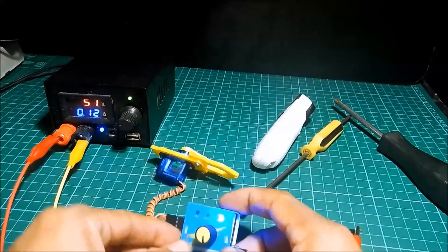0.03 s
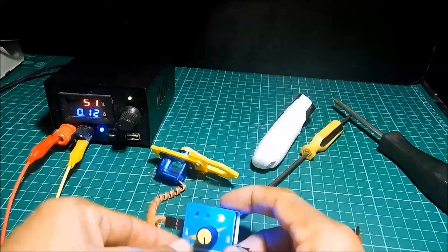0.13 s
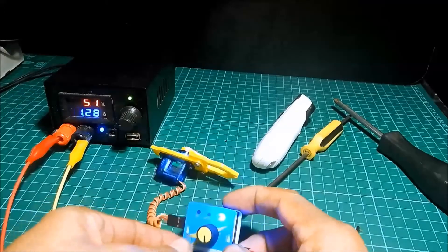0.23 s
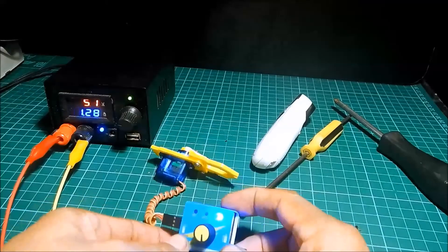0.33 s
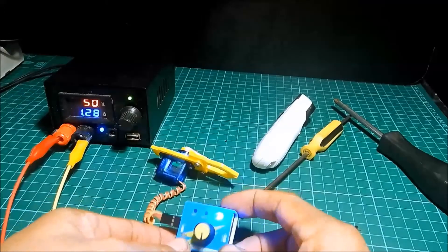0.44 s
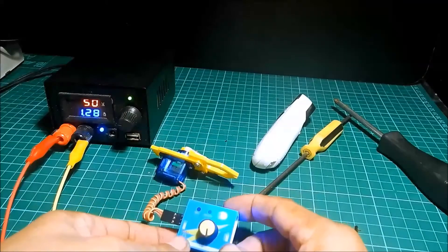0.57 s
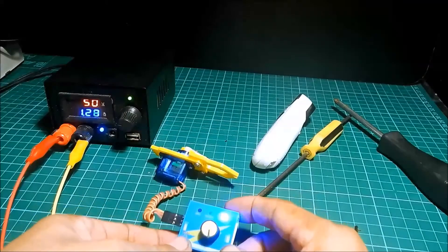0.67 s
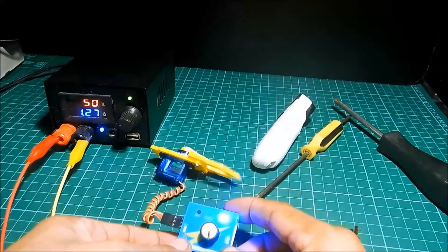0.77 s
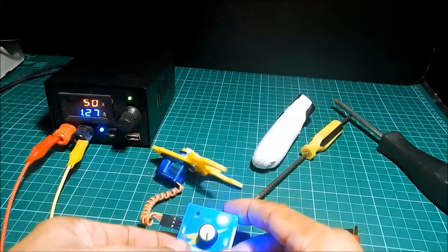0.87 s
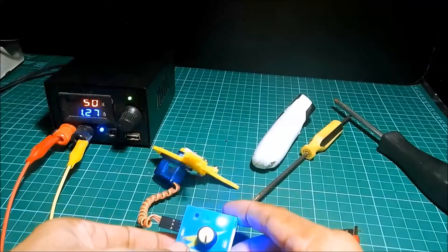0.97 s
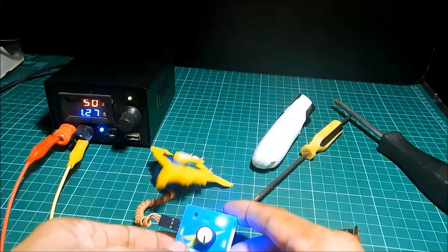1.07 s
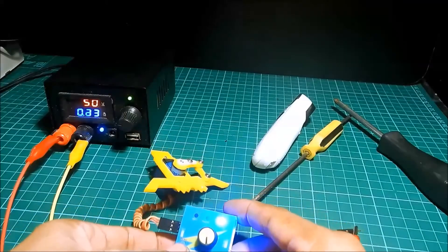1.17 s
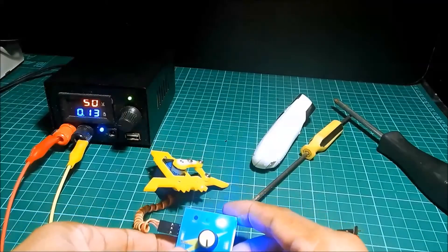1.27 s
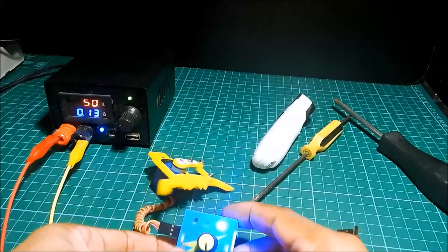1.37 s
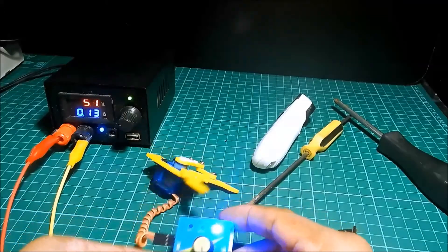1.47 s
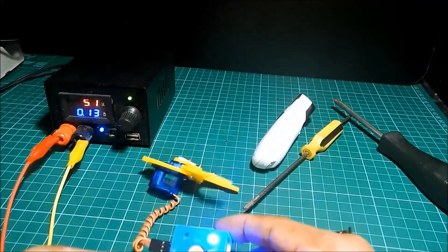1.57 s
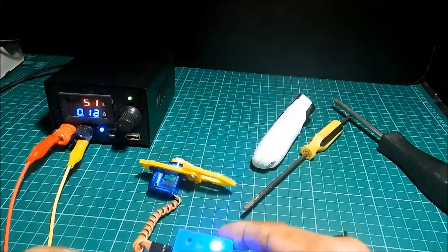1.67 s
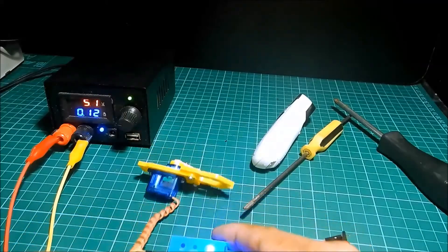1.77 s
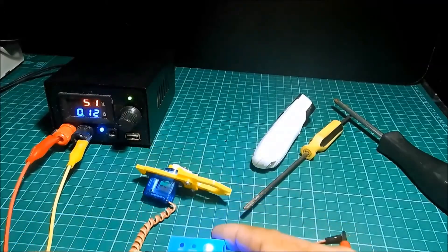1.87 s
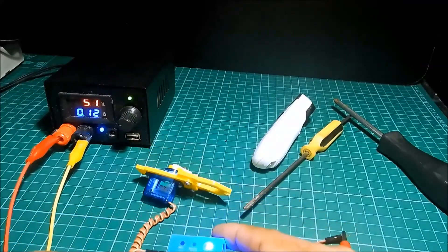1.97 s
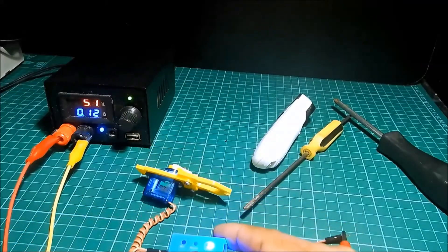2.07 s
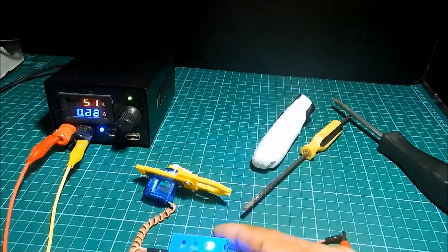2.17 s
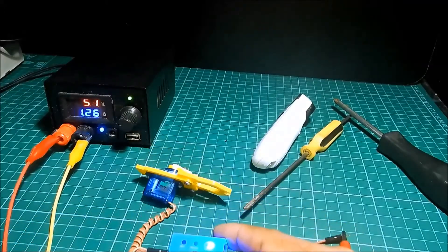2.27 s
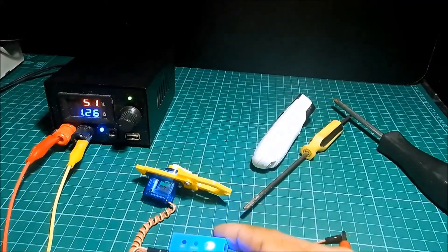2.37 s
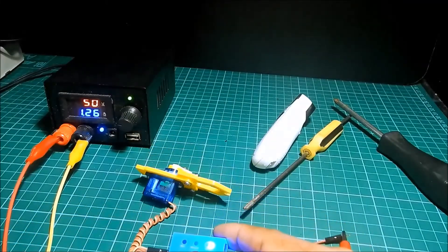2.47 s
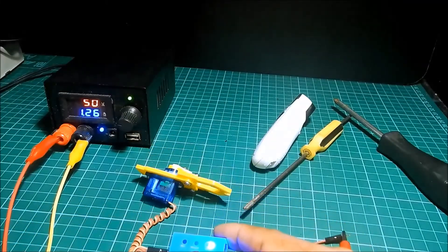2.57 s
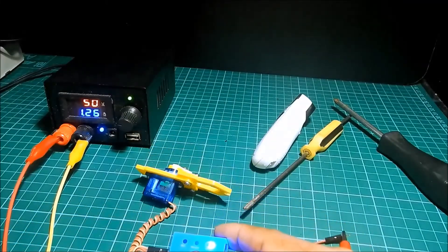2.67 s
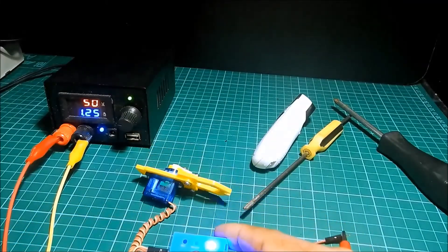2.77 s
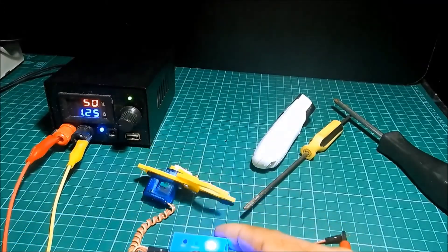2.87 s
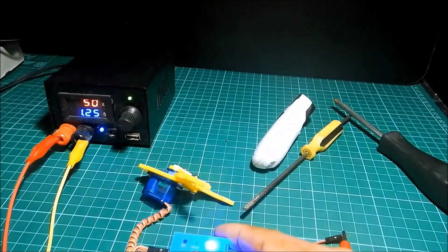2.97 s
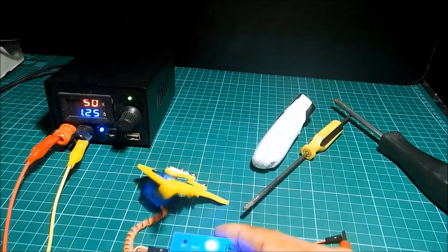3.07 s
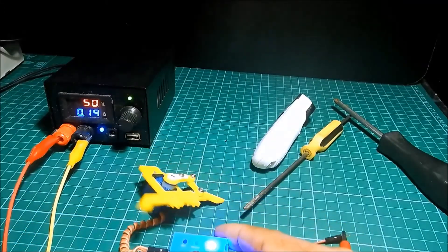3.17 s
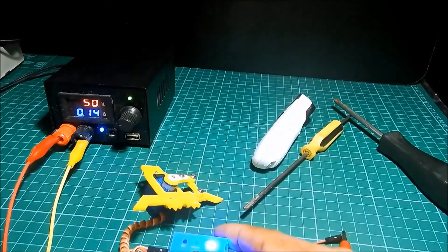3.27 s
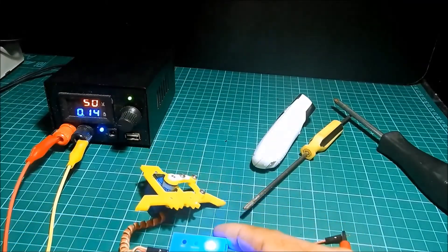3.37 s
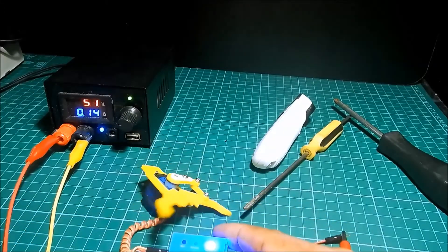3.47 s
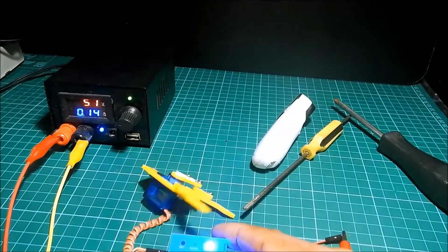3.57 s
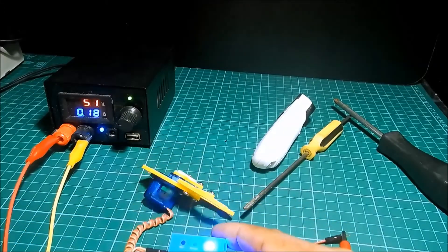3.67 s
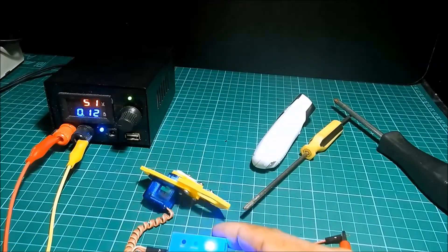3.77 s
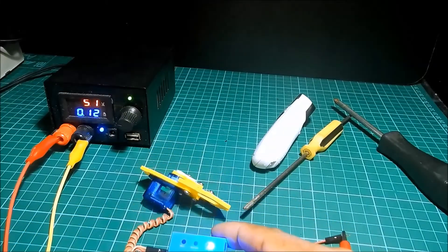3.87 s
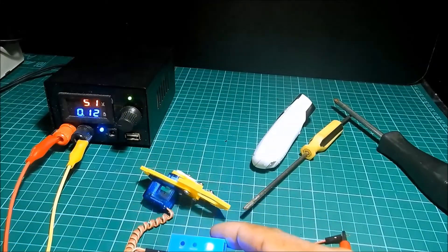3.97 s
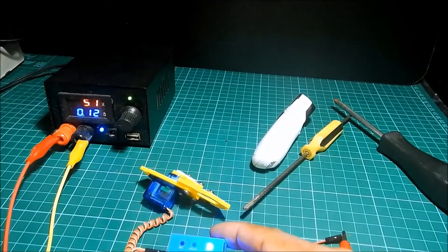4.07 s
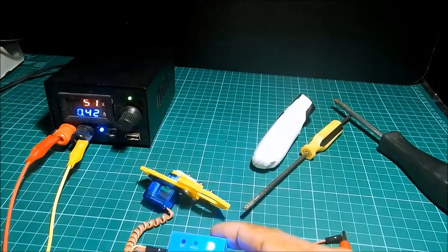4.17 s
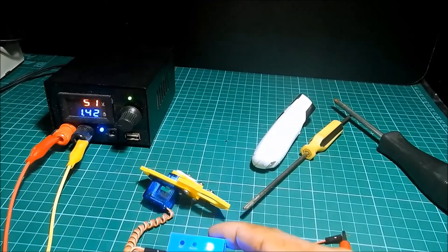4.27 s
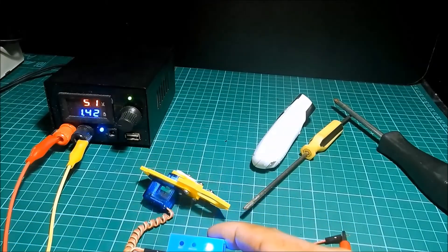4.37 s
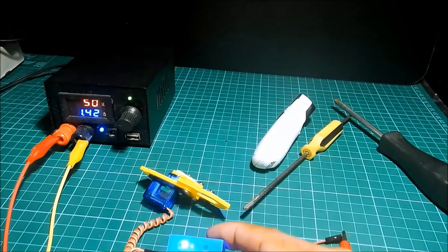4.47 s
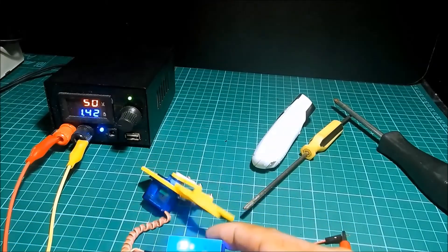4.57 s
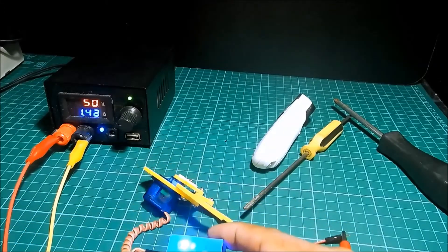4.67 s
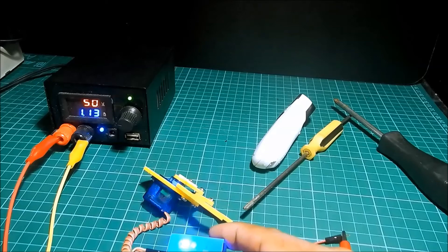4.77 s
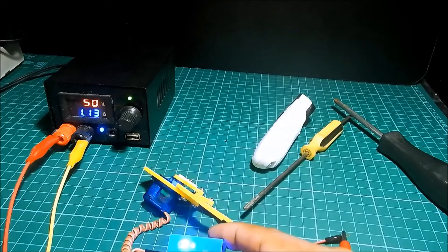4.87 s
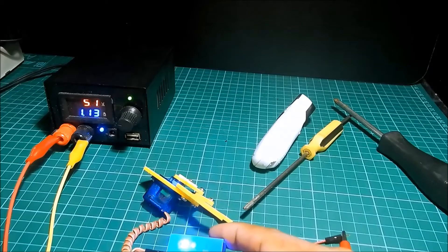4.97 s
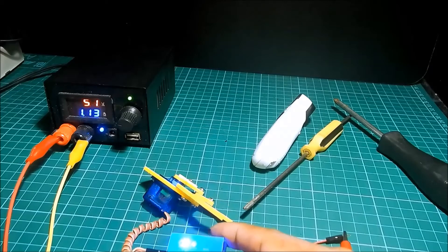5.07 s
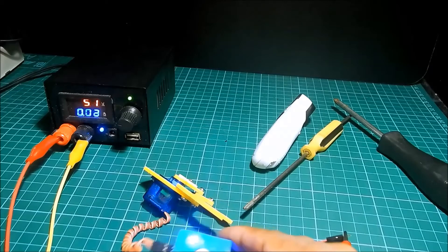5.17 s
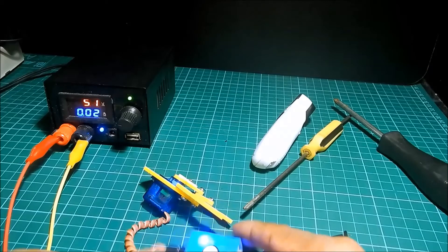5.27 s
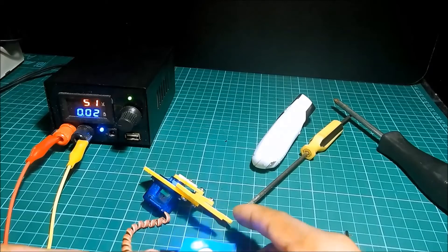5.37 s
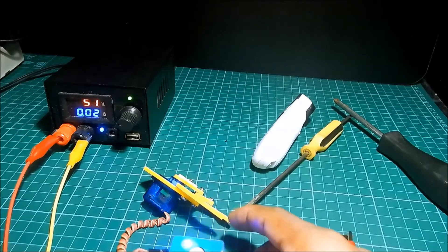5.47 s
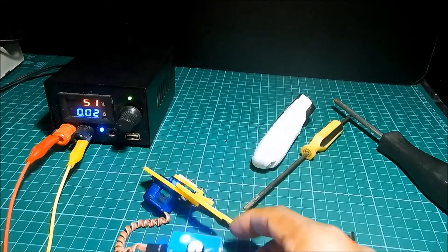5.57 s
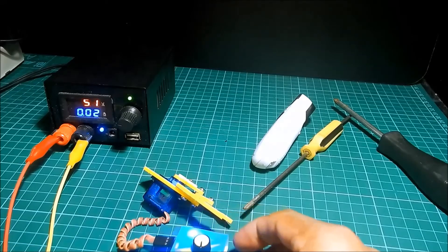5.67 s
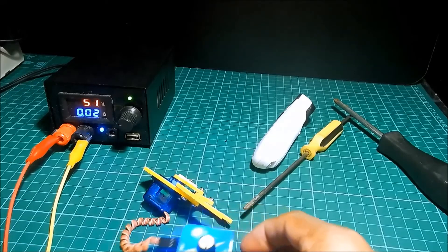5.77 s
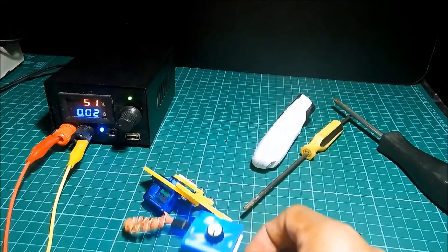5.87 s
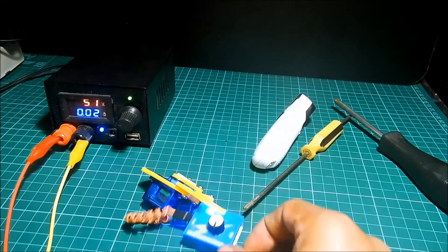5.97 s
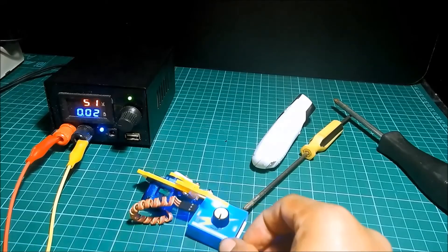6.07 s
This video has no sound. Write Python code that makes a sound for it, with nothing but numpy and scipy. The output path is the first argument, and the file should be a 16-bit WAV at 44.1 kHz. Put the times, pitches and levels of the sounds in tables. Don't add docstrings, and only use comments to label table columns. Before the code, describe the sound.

A steady low fan hiss and quiet room rumble lie under everything, with a far drone swelling faintly. From 0 to 0.8 s fingers slide softly on a plastic box, with a few tiny ticks. At 0.83 s a small servo whirs, bright and gritty, until 1.2 s, with a sharp plastic clack at 0.9 s and lighter knocks. A nudge at 1.25 s leads to a rising whir from 1.38 to 1.81 s, rattling and drumming on the bench, then a soft drag and settling at 1.9 s. Quiet handling follows. Another hard clack at 2.95 s accompanies whirs at 2.9-3.33 and 3.44-3.87 s. After a pause, a loud click at 4.57 s precedes a very short, straining stroke and the loudest snap at 4.64 s, ending with a click at 4.72 s. Faint rustles, wrist shifts and dry ticks continue to 6.1 s. Close microphone, small room.

```python
import sys
import numpy as np
from scipy import signal
from scipy.fft import rfft, irfft, next_fast_len
from scipy.io import wavfile

SR = 44100
rng = np.random.default_rng(int(sys.argv[2]) if len(sys.argv) > 2 else 0)


def how_loud(loudness_db):
    steps = np.asarray(loudness_db, float) / 20
    return 10 ** steps


def transcribe(u):
    v = np.clip(np.atleast_2d(u).T, -1, 1)
    q = np.round(v * 32767).astype(np.int16)
    wavfile.write(sys.argv[1], SR, q)


N = 269887

# frequency in Hz, level in dB per Hz.
AIR = [(12, -37), (20, -7), (107, -2.5), (301, -14.5), (485, -16.5), (607, -21), (849, -20.5), (976, -22.5),
       (1710, -20.5), (1960, -28.5), (2670, -30.5), (3530, -36), (4670, -42), (6540, -55.5), (9000, -63),
       (16000, -63)]
# centre in Hz, width in Hz, lift in dB.
CAVITY_RINGS = [(1614, 170, 3.5), (2757, 140, 9.5), (4650, 530, 10)]
# frequency in Hz, likeness from -1 to 1.
LIKENESS = [(60, 1), (180, 0.86), (550, 0.85), (1650, 1), (4970, 0.56), (15000, 0.62)]
# start in seconds, end in seconds, level in dB.
DRONE = [
    (0.7, 0.85, -49.5),
    (1.25, 1.35, -46.5),
    (1.5, 1.7, -50.5),
    (3.55, 3.7, -44),
    (3.9, 4.3, -49.5),
    (5.2, 5.4, -47),
    (6.05, 6.12, -54.5),
]
# start in seconds, end in seconds, level in dB, centre from Hz, to Hz.
SLIDES = [(0.0, 0.13, -67.5, 4500, 4650), (0.15, 0.22, -68, 4700, 4900), (0.36, 0.44, -77.5, 4700, 4700),
          (2.52, 2.6, -73, 2290, 2470), (2.68, 2.72, -75, 4600, 4630), (4.0, 4.08, -80, 4570, 4500),
          (4.17, 4.23, -79, 4700, 4700), (4.27, 4.36, -68, 4650, 4650), (4.38, 4.54, -75, 4650, 4640),
          (4.95, 5.03, -76, 4220, 4540), (5.16, 5.24, -73, 4750, 4570), (5.25, 5.33, -67.5, 3900, 4200),
          (5.35, 5.44, -70, 4900, 4900), (5.46, 5.62, -66.5, 4800, 4800), (5.64, 5.76, -73.5, 5600, 5900),
          (5.81, 5.97, -69, 5020, 5500), (6.0, 6.12, -70, 4050, 4400)]
# frequency in Hz, level in dB per Hz.
SKIN = [(1060, -40), (1800, -27), (2220, -6), (2940, 3.5), (4010, -2), (4940, 2), (7060, -27.5),
        (9000, -66.5), (11700, -79), (19800, -120)]
# start in seconds, end in seconds, level in dB.
SLEEVE = [
    (0.155, 0.215, -83),
]
# start in seconds, end in seconds,
# level in dB.
WRISTS = [
    (0.27, 0.3, -63),
    (1.89, 1.965, -47),
    (2.5, 2.55, -58),
    (2.68, 2.75, -48.5),
    (4.1, 4.16, -50.5),
    (4.2, 4.55, -62),
    (4.95, 5.0, -51.5),
    (5.17, 5.45, -59),
    (5.88, 5.91, -49),
    (6.03, 6.12, -50.5),
]
# start in seconds, peak in dB, centre in Hz, decay t60 in seconds, left-right balance in dB.
TICKS = [(0.236, -50, 1300, 0.012, 3), (0.2578, -45.5, 2700, 0.013, 2), (0.279, -42, 2920, 0.034, 2),
         (0.28, -48, 800, 0.03, 2), (0.5753, -53.5, 3750, 0.008, 7), (0.7787, -50, 3060, 0.007, 7),
         (1.6252, -37.5, 4800, 0.0085, -3), (1.781, -51.5, 11400, 0.03, -0.5), (2.528, -53, 2500, 0.04, 2),
         (2.68, -51, 3300, 0.04, 2), (3.274, -45, 3500, 0.015, 0.5), (3.302, -40, 3300, 0.035, 0.5),
         (3.421, -44, 4000, 0.02, 3), (3.755, -37, 2400, 0.04, 0.5), (3.834, -50.5, 12000, 0.018, 0.5),
         (3.8345, -31, 6000, 0.01, 0.5), (4.4593, -50, 4800, 0.018, 5), (4.5714, -12, 4300, 0.007, 2.5),
         (5.385, -43, 2500, 0.015, 2), (5.3855, -46, 1200, 0.02, 2), (5.386, -48, 4800, 0.015, 2),
         (5.405, -50, 3350, 0.02, 3), (5.4503, -39.5, 3600, 0.015, -4), (5.4816, -45, 3500, 0.02, 1.0),
         (5.498, -48, 3480, 0.015, 8), (5.509, -52, 3500, 0.02, 3), (5.7055, -53, 3480, 0.017, 0.5),
         (5.726, -52, 3380, 0.013, 9), (5.8551, -46, 4500, 0.012, 2), (5.899, -52, 3500, 0.015, 2),
         (5.918, -53, 3400, 0.012, 2), (5.9623, -54, 4670, 0.011, 0.0), (5.9873, -52, 4800, 0.013, 5),
         (6.0295, -38, 3300, 0.036, 3.5), (6.0396, -42, 3300, 0.028, -4)]
# start in seconds, end in seconds, level in dB.
DRAG = [
    (1.82, 1.86, -76),
    (1.88, 1.96, -53.5),
    (2.68, 2.73, -56.5),
]
# frequency in Hz, level in dB, decay t60 in seconds.
GRIPPER = [(587, -5.5, 0.024), (760, -2.5, 0.019), (1094, -55.5, 0.014), (1240, -25, 0.048),
           (1503, 8, 0.023), (1574, -16.5, 0.013), (2040, 2.5, 0.0099), (2190, -3.5, 0.015),
           (2547, -1, 0.028), (2700, -1.5, 0.015)]
# frequency in Hz, level in dB, decay t60 in seconds.
SNAP = [(3060, 4, 0.01), (3200, -4.5, 0.031), (3487, 10.5, 0.018), (4370, 20, 0.0039), (4710, -2.5, 0.012),
        (5300, -13, 0.013), (7005, -6, 0.015)]
# frequency in Hz, level in dB, decay t60 in seconds.
BENCH = [(197, -9, 0.19), (227.6, 0, 0.069), (289.7, -12.5, 0.12), (525, -9, 0.057)]
# time in seconds, body peak in dB, bright snap in dB, bench thud in dB.
KNOCKS = [(0.903, -12.5, -46, -34.5), (0.969, -31, -75, -45), (1.072, -37.5, -65, -73),
          (1.193, -31.5, -47, -33), (1.235, -32.5, -47, -33), (1.259, -47, -37.5, -66),
          (1.405, -32.5, -55, -44), (1.558, -40, -57, -64), (1.617, -36.5, -53, -38.5),
          (1.702, -24.5, -53, -34), (1.73, -37, -50, -52), (1.781, -50, -39.5, -37), (1.81, -41, -54, -40),
          (2.9545, -13, -21.5, -35), (3.024, -33.5, -59, -44.5), (3.117, -37.5, -59, -72),
          (3.273, -30.5, -44, -28.5), (3.304, -54, -48, -68), (3.457, -42, -46, -40.5),
          (3.507, -37, -52, -56), (3.669, -36.5, -43, -39.5), (3.753, -31.5, -50, -34),
          (3.786, -38, -46, -48.5), (3.834, -35.5, -34, -59), (4.6353, -5, -10.5, -31),
          (4.715, -19.5, -40, -35.5), (4.719, -49, -23.5, -39)]
# time in seconds, peak in dB.
BUMPS = [(0.277, -41.5), (0.855, -36), (1.27, -36), (1.511, -50), (1.666, -36), (1.847, -42.5),
         (1.899, -42), (1.933, -35), (2.923, -38.5), (2.989, -35), (3.231, -34.5), (3.638, -40.5),
         (3.89, -40), (4.126, -44), (4.613, -37), (4.679, -31), (5.181, -44), (5.359, -45), (5.4, -43.5)]
# time in seconds, peak in dB, length in seconds, share of jaw scrape in dB.
STRAINS = [(0.826, -45, 0.013, -41), (0.8398, -34.5, 0.019, -24), (0.865, -29, 0.018, -17),
           (0.874, -31.5, 0.021, -3.5), (0.931, -32.5, 0.0098, -19), (0.947, -37, 0.0089, -18),
           (1.008, -55, 0.032, -29), (1.182, -39.5, 0.022, -22), (1.254, -51, 0.021, 4),
           (1.389, -41.5, 0.043, -11), (1.494, -46, 0.063, -14.5), (1.592, -48, 0.049, -35),
           (1.68, -46, 0.018, -9), (1.746, -39.5, 0.021, -24), (1.761, -30, 0.0076, -36),
           (1.78, -32.5, 0.013, -9), (2.878, -37, 0.031, -38), (2.918, -31.5, 0.035, -6),
           (2.99, -47, 0.023, 0), (3.126, -42, 0.0072, -8), (3.161, -39.5, 0.015, -33),
           (3.203, -38, 0.0085, -27), (3.316, -51, 0.028, -8), (3.45, -38, 0.028, -11.5),
           (3.8, -32, 0.026, -18), (3.835, -30.5, 0.015, -12), (4.598, -25.5, 0.017, -22),
           (4.618, -21.5, 0.034, -10.5), (4.625, -24, 0.017, -23), (4.72, -28.5, 0.014, -11)]
# time in seconds, peak in dB.
KICKS = [(0.9964, -44), (1.009, -41), (1.0265, -35), (1.0494, -45), (1.07, -43), (1.0869, -40.5),
         (1.107, -41), (1.1244, -48), (1.1488, -44), (1.1697, -39), (1.2271, -46), (1.265, -45),
         (1.4187, -52), (1.4394, -41.5), (1.48, -42), (1.5194, -42), (1.5394, -41), (1.581, -39),
         (1.6394, -40.5), (1.6594, -41), (1.704, -49), (1.7244, -42), (2.984, -38), (3.0034, -42),
         (3.0244, -53), (3.044, -39), (3.065, -42), (3.0799, -40), (3.106, -43), (3.142, -35.5),
         (3.1603, -44), (3.1794, -54), (3.2244, -41), (3.243, -39), (3.3019, -45), (3.3294, -48),
         (3.4339, -39), (3.4984, -41), (3.5194, -50), (3.5394, -54), (3.5795, -38), (3.6094, -45),
         (3.6406, -42), (3.659, -38), (3.677, -44), (3.698, -48), (3.7249, -43), (3.7394, -37),
         (3.7794, -40), (3.852, -33.5), (3.8844, -41), (4.6544, -51), (4.6718, -45), (4.694, -33)]
# full speed in seconds, drive cut in seconds,
# whirr at start in dB, whirr at end in dB, bench drumming in dB.
STROKES = [
    (0.833, 1.204, -49.5, -50.5, -69.5),
    (1.252, 1.26, -48.5, -45, -59),
    (1.382, 1.811, -49.5, -44.5, -57.5),
    (2.893, 3.33, -49, -50.5, -70),
    (3.44, 3.865, -47.5, -47, -59),
    (4.611, 4.719, -46, -44.5, -53),
]
# lower ring from Hz, to Hz, upper ring from Hz, to Hz.
CASE_ROLL = [(4990, 4910, 6660, 6640), (4920, 4920, 6590, 6590), (4920, 4870, 6580, 6510),
             (4920, 4660, 6450, 6750), (4740, 4780, 6600, 6620), (4750, 4750, 6700, 6700)]
# lower ring from dB, to dB, upper ring from dB, to dB.
CASE_FACING = [(8, 1, 3.5, 4.5), (4, 4.5, 4, 4.5), (5, 8, 0.5, 3.5), (7.5, 9.5, -2, 0), (2.5, 5, -1, -0.5),
               (0.5, 4.5, -5, -5.5)]
# frequency in Hz, width in Hz, level in dB.
CASE = [(3420, 200, -11), (3850, 150, -14), (4300, 200, -13), (5500, 150, -9), (5780, 200, -11),
        (7500, 200, -15), (7950, 200, -17), (8600, 250, -23), (9400, 250, -27)]
# frequency in Hz, level in dB per Hz.
MESH = [(1800, -36), (3000, -23.5), (4200, -13), (5600, -10.5), (7200, -15), (8300, -22.5), (9600, -27),
        (10300, -35), (12800, -44.5), (14500, -45), (16000, -49.5), (17000, -69.5)]
# lower edge in Hz, upper edge in
# Hz, level in dB.
MESH_TOP = [(10300, 11600, -9), (11600, 16000, -5), (13140, 14800, -4)]

AIR_DB = -56
SWELL_DB_PER_S, SLIDE_DB_PER_S, SETTLE_DB_PER_S, DRAG_DB_PER_S = 39, 258.5, 214.5, 406
TICK_FIZZ, LOUD_TICK_FIZZ = 0.22, 0.1
SOFT_TICK_DULL = 0.28
KICK_S, KICK_DB = 0.017, -13
FRAME_HZ = 47.6
SPIN_UP_DB_PER_S, RUN_DOWN_DB_PER_S = 592, 267
DRUM_FADE_DB_PER_S = 192.5
RATTLE_DB = -13
WOBBLE_HZ, RING_WIDEN, TOP_PATCH_DB = 30, 1.15, 6.5
ROOM_T60_S, ROOM_DB, GRIPPER_ROOM_DB, TICK_ROOM_DB = 0.39, -14, 1.5, -3.5
ROOM_ALIKE = 0.44


def rms_one(x):
    return x / np.sqrt(np.mean(x ** 2) + 1e-20)


def at_hz(points, hz):
    points = np.array(points)
    return np.interp(np.log(hz), np.log(points[:, 0]), points[:, 1])


def coloured(x, spectrum, rings=()):
    size = next_fast_len(N)
    hz = np.arange(size // 2 + 1) * SR / size + 1
    shape_db = at_hz(spectrum, hz) + sum(db / (1 + (2 * (hz - f) / w) ** 2) for f, w, db in rings)
    return rms_one(irfft(rfft(x, size) * how_loud(shape_db), size)[..., :N])


def band(x, low_hz, high_hz, order=2):
    edges = [low_hz, min(high_hz, 0.45 * SR)]
    return signal.sosfilt(signal.butter(order, edges, "band", fs=SR, output="sos"), x)


def drift(rate):
    r = np.exp(-80 * np.pi * rate / SR)
    slow = signal.lfilter([1], [1, -2 * r, r * r], rng.standard_normal(N // 40 + 2002))[2000:]
    return np.interp(np.arange(N) / 40, np.arange(len(slow)), rms_one(slow))


def ring(clicks, hz, t60):
    r, w = how_loud(-60 / (t60 * SR)), 2 * np.pi * hz / SR
    return signal.lfilter([0, np.sin(w)], [1, -2 * r * np.cos(w), r * r], clicks + 1e-18)


def resonance(x, hz, width):
    turn = np.exp(2j * np.pi * np.cumsum(hz * np.ones(N)) / SR)
    r = np.exp(-np.pi * width / SR)
    return rms_one((turn * signal.lfilter([1], [1, -r], x * turn.conj())).real)


def peak(x, hz, width):
    r = np.exp(-np.pi * width / SR)
    return rms_one(signal.sosfilt(2 * [[1, 0.00043, -1, 1, -2 * r * np.cos(2 * np.pi * hz / SR), r * r]], x))


def contacts(per_s, spread_db):
    sizes = how_loud(spread_db * np.minimum(rng.exponential(1, N), 4)) * rng.choice([-1, 1], N)
    return rms_one(sizes * (rng.random(N) < per_s / SR))


def struck(times, levels_db, modes, scatter_db, dull_db=0):
    at, out = [round(s * SR) for s in times], np.zeros(N)
    chance = rng.standard_normal((len(at), len(modes)))
    for k, (hz, level_db, t60) in enumerate(modes):
        tilt_db = dull_db * max(np.log2(hz / 1400), 0)
        clicks = np.zeros(N)
        clicks[at] = -how_loud(levels_db + level_db + scatter_db * chance[:, k] - tilt_db)
        out += ring(clicks, hz, t60)
    return out


def gestures(spans, levels_db, rise_db_per_s, fall_db_per_s):
    t = np.arange(0, N + 16, 16) / SR
    a, b = np.transpose(spans)[:, :, None]
    first, last = np.transpose(levels_db)[:, :, None]
    level = first + (last - first) * np.clip((t - a) / np.maximum(b - a, 1e-3), 0, 1)
    level = level - rise_db_per_s * np.maximum(a - t, 0) - fall_db_per_s * np.maximum(t - b, 0)
    return np.interp(np.arange(N) / SR, t, np.max(level, axis=0))


def held(rows, db_per_s):
    rows = np.array(rows)
    return how_loud(gestures(rows[:, :2], rows[:, [2, 2]], db_per_s, db_per_s))


def glide(spans, values):
    return np.interp(np.arange(N) / SR, np.ravel(spans), np.ravel(values))


def air():
    mid, side = rng.standard_normal((2, N))
    hz, alike = np.transpose(LIKENESS)
    alike = np.clip(alike, -0.95, 0.95)
    side_db = 10 * np.log10((1 - alike) / (1 + alike))
    side = coloured(side, np.transpose([hz, side_db])) * how_loud(0.5)
    hiss = coloured(np.array([mid + side, mid - side]), AIR, CAVITY_RINGS) * how_loud(AIR_DB) * how_loud([[-1.8], [1.8]])
    drone = peak(rng.standard_normal(N), 143, 30) * held(DRONE, SWELL_DB_PER_S)
    return hiss + drone * how_loud(-7.0) * how_loud([[-1.2], [1.2]])


def room(x):
    t = np.arange(round(0.6 * SR)) / SR
    white = rng.standard_normal((2, len(t))) * np.minimum(t / 0.0037, 1)
    white = white + np.clip(ROOM_ALIKE, 0, 1) * white[::-1]
    dull = signal.lfilter([0.5], [1, -0.5], white)
    tail = dull * how_loud(-60 * t / ROOM_T60_S)
    tail = tail + (white - dull) * how_loud(-60 * t / (ROOM_T60_S * 0.5))
    tail = tail / np.sqrt(np.sum(tail ** 2) / 2)
    return how_loud(ROOM_DB) * signal.fftconvolve(x[None], tail, axes=1)[:, :N]


def hands():
    rows = np.array(SLIDES)
    centre_hz = glide(rows[:, :2], rows[:, 3:])
    grain = rng.standard_normal((2, N)) + 3.0 * contacts(per_s=3000, spread_db=1.5)
    palm = resonance(resonance(grain[0], centre_hz, 600), centre_hz, 600)
    rustle = rms_one(coloured(grain, SKIN) + how_loud(-8.5) * palm) * held(SLIDES, SLIDE_DB_PER_S)
    sleeve = rms_one(band(grain, 4400, 7400, order=3)) * held(SLEEVE, SLIDE_DB_PER_S)
    wrists = rms_one(band(rng.standard_normal(N), 130, 303.8)) * held(WRISTS, SETTLE_DB_PER_S)
    return rustle + sleeve + wrists * how_loud(-9)


def ticks():
    out, t = np.zeros((2, N)), np.arange(2000) / SR
    for (s, db, hz, t60, pan_db), fizz in zip(TICKS, rng.standard_normal((len(TICKS), 2000))):
        start = round((s + 0.001) * SR)
        fizz_gain = TICK_FIZZ if db < -20 else LOUD_TICK_FIZZ
        burst = (t == 0) + fizz_gain * fizz * how_loud(-60 * t / t60)
        centre = band(burst, hz / 1.7, hz * 1.23, order=3)
        body = how_loud(-6) * band(burst, hz / 4, hz / 1.7)
        top = how_loud(-26.5) * band(burst, hz * 1.5, hz * 2.4) + how_loud(-42.5) * band(burst, 9000, 15500)
        sound = centre + body + how_loud(SOFT_TICK_DULL * (db + 14.5)) * top
        sound = (sound / np.abs(sound).max())[:N - start]
        out[:, start:][:, :len(sound)] += how_loud(db) * sound * how_loud([[pan_db / 2], [-pan_db / 2]])
    return out


def drag():
    slips = contacts(per_s=1800, spread_db=3.0)
    scrape = sum(how_loud(db * 0.5) * ring(slips, hz, t60 * 0.28) for hz, db, t60 in GRIPPER[:7])
    return held(DRAG, DRAG_DB_PER_S) * band(scrape, 250, 1830, order=3) * how_loud(-22.5)


def knocks():
    s, body_db, snap_db, thud_db = np.transpose(KNOCKS)
    softness = np.clip(-17.0 - body_db, 0, 30)
    body = struck(s + 0.001099, body_db - 19, GRIPPER, scatter_db=0.5, dull_db=0.22 * softness)
    snap = struck(s + 0.00105, snap_db - 19.5, SNAP, scatter_db=1.0)
    thud = struck(s + 0.0018, thud_db, BENCH, scatter_db=2.5)
    bump_s, bump_db = np.transpose(BUMPS)
    thud += struck(bump_s, bump_db - 4, BENCH, scatter_db=2.0)
    starts = np.zeros((2, N))
    at = np.round((s + 0.001) * SR).astype(int)
    starts[0, at] = how_loud(body_db - 0.5)
    starts[1, at] = how_loud(body_db - 7 - 1.3 * softness)
    fade = signal.lfilter([1], [1, -how_loud(-60 / (0.032 * SR))], starts + 1e-18)
    dying = fade * rng.standard_normal((2, N))
    chatter = band(dying[0], 1190, 1810, order=3) + band(dying[1], 2500, 4900, order=3)
    return -band(band(body + snap, 580, 5200, order=3), 670, 7100) + chatter + band(thud, 155, 440)


def strain():
    gears, jaws = np.zeros(N), np.zeros(N)
    for s, db, length, scrape_db in STRAINS:
        start = round((s - 0.002) * SR)
        phase = np.linspace(0, 1, round(np.clip(length, 0.004, 0.05) * 1.15 * SR))
        swell = np.sin(np.pi * phase ** 0.64)
        gears[start:start + len(swell)] += how_loud(db - 11.5) * swell
        jaws[start:start + len(swell)] += how_loud(db - 7.5 + scrape_db) * swell
    return gears, jaws


def kicks():
    s, db = np.transpose(KICKS)
    starts = np.zeros(N)
    starts[((s - 0.0045) * SR).astype(int)] = how_loud(db + KICK_DB)
    swell = np.sin(np.pi * np.linspace(0, 1, round(KICK_S * SR)) ** 1.4)
    return np.abs(signal.fftconvolve(starts, swell)[:N])


def gear_mesh():
    mesh = coloured(np.array([contacts(per_s=1500, spread_db=2.5) for port in "LR"]), MESH)
    top = sum(band(mesh, low, high, order=4) * how_loud(db + TOP_PATCH_DB * drift(18)) for low, high, db in MESH_TOP)
    return band(mesh, 1000, 9820, order=6) + top


def servo_case(spans):
    roll, facing = np.array(CASE_ROLL), np.array(CASE_FACING)
    low_hz = glide(spans, roll[:, :2]) + WOBBLE_HZ * drift(10)
    high_hz = glide(spans, roll[:, 2:]) + WOBBLE_HZ * drift(18)
    low_db, high_db = glide(spans, facing[:, :2]), glide(spans, facing[:, 2:])
    teeth = contacts(per_s=6000, spread_db=2.0)
    case = resonance(resonance(teeth, low_hz, 290), low_hz, 290) * how_loud(low_db + 1.2 * drift(25))
    case += resonance(resonance(teeth, high_hz, 300), high_hz, 300) * how_loud(high_db + 1.2 * drift(25))
    for k, (hz, width, db) in enumerate(CASE):
        case += (-1) ** k * how_loud(db) * peak(teeth, hz, RING_WIDEN * width) * how_loud(2.0 * drift(8))
    return rms_one(band(case, 3200, 9800, order=5))


def servo():
    rows = np.array(STROKES)
    spans = rows[:, :2]
    whirr_db = gestures(spans, rows[:, 2:4], SPIN_UP_DB_PER_S, RUN_DOWN_DB_PER_S)
    drum_db = gestures(spans, rows[:, [4, 4]], SPIN_UP_DB_PER_S, DRUM_FADE_DB_PER_S)
    gear_load, jaw_load = strain()
    throb_db = 1.0 * np.sin(2 * np.pi * FRAME_HZ * np.arange(N) / SR) + 1.2 * drift(40)
    mesh = gear_mesh()
    case = rms_one(servo_case(spans) + how_loud(-6.5) * mesh)
    whirr = case * (how_loud(whirr_db - 6.0 + throb_db) + gear_load + kicks())
    whirr += how_loud(-2.5) * gear_load * band(mesh, 9500, 16000)
    whirr += how_loud(-3.5) * gear_load * band(mesh, 3800, 5600)
    whirr += how_loud(-13.5) * gear_load * band(mesh, 5600, 8200)
    play = contacts(per_s=4600, spread_db=3.0)
    rattle = rms_one(sum(how_loud(db) * ring(play, hz, t60 * 0.38) for hz, db, t60 in GRIPPER + SNAP[:3]))
    rattle = band(rattle, 400, 4600) * (how_loud(whirr_db + RATTLE_DB + 3.0 * drift(40)) + jaw_load)
    drum = sum(how_loud(db) * ring(contacts(per_s=300, spread_db=3.5), hz, t60) for hz, db, t60 in BENCH)
    return whirr, rattle + band(rms_one(drum), 150, 410) * how_loud(drum_db)


def scene():
    whirr, shaken = servo()
    gripper = shaken + knocks() + drag()
    near = ticks()
    direct = whirr * how_loud([[-0.3], [0.3]]) + gripper * how_loud([[-0.7], [0.7]]) + near
    spread = (whirr + how_loud(TICK_ROOM_DB) * near).mean(axis=0) + how_loud(GRIPPER_ROOM_DB) * gripper
    return direct + room(spread) + hands() + air()


def roll_off(x):
    return signal.sosfilt(signal.butter(12, 16460, fs=SR, output="sos"), x)


def record(dry):
    heard = band(dry, 34, 19000)
    return roll_off(heard)


dry = scene()
out = record(dry)
transcribe(out)
```